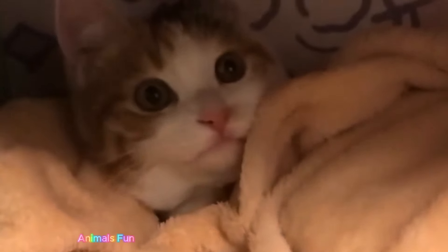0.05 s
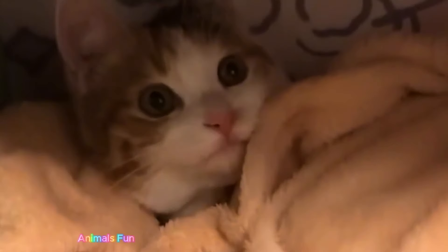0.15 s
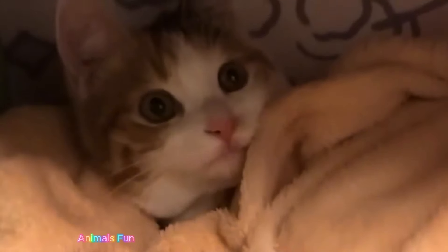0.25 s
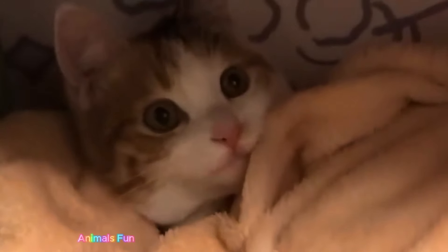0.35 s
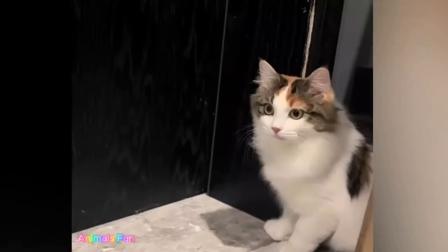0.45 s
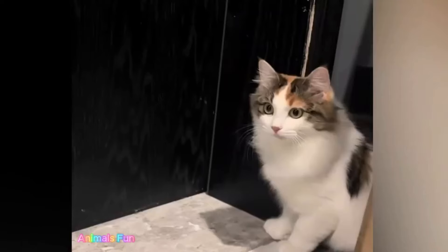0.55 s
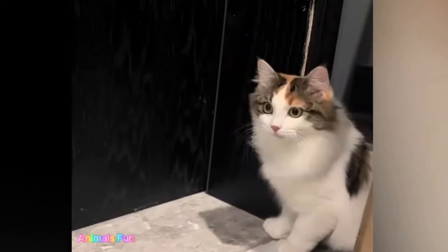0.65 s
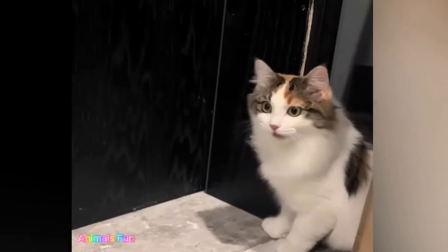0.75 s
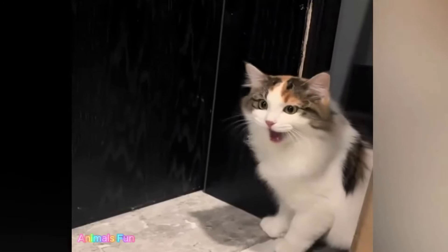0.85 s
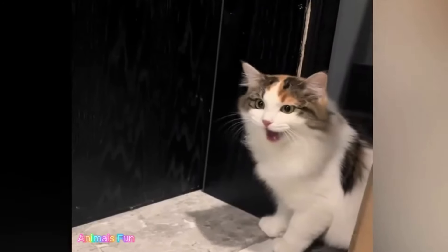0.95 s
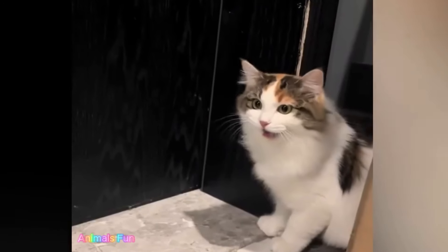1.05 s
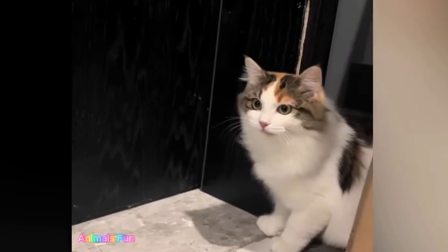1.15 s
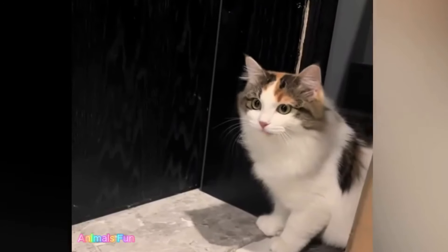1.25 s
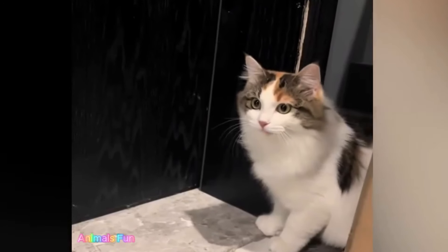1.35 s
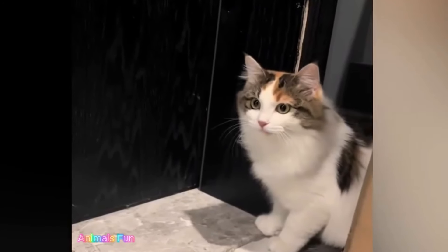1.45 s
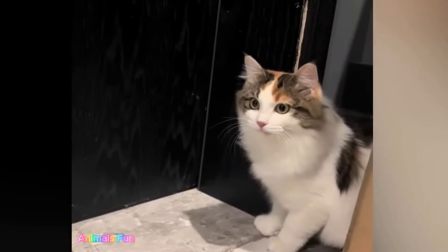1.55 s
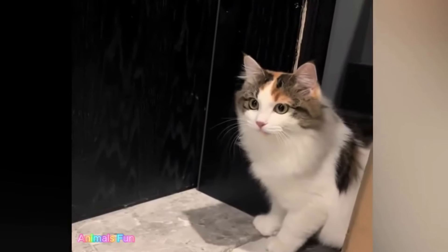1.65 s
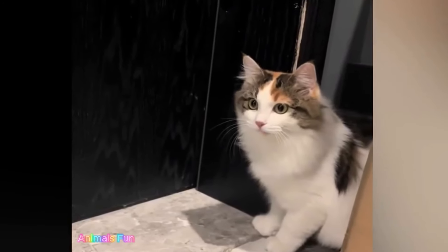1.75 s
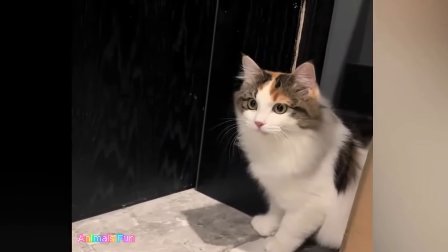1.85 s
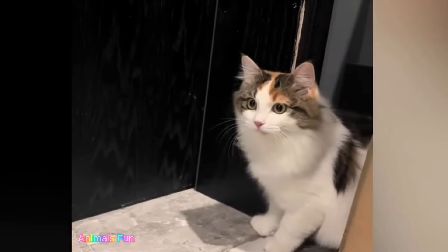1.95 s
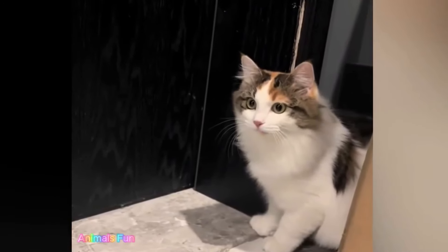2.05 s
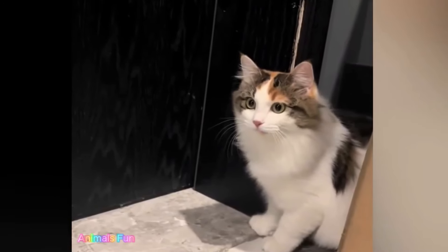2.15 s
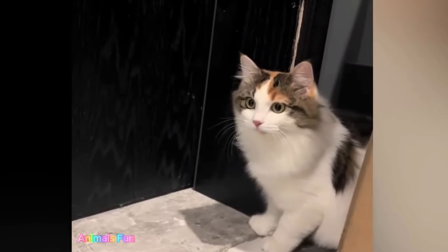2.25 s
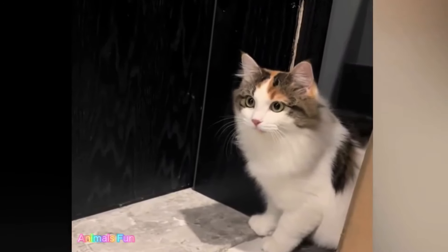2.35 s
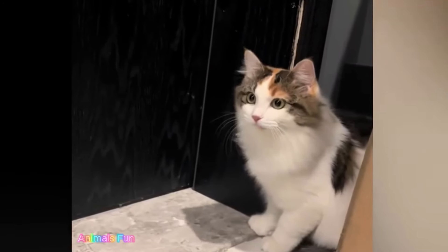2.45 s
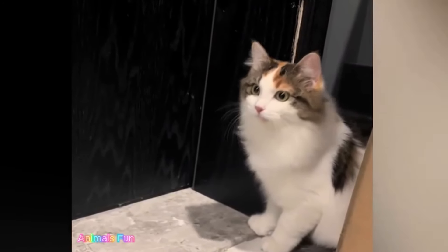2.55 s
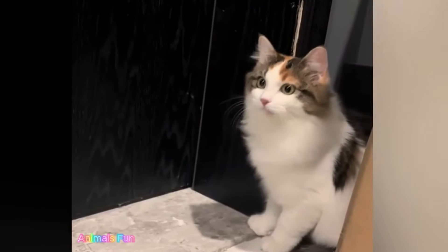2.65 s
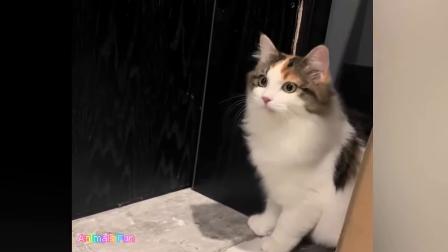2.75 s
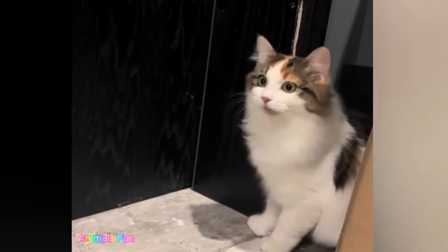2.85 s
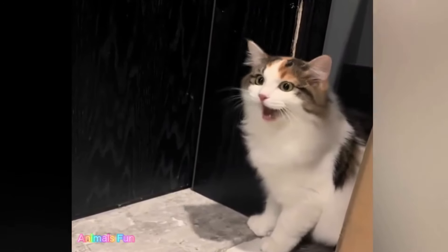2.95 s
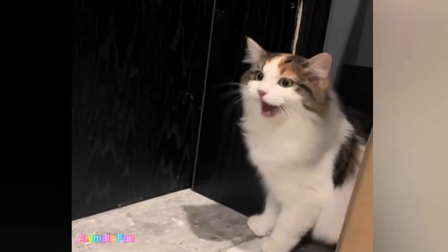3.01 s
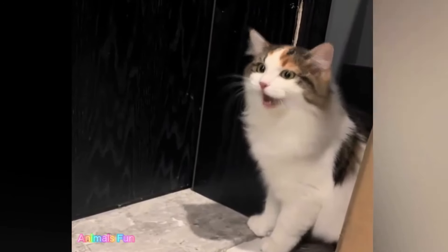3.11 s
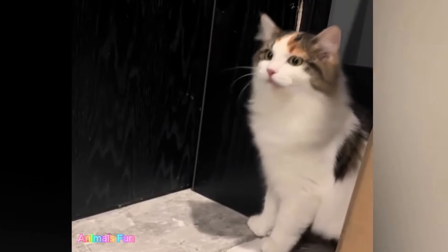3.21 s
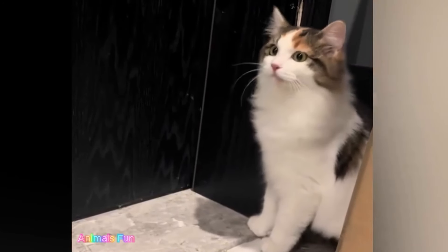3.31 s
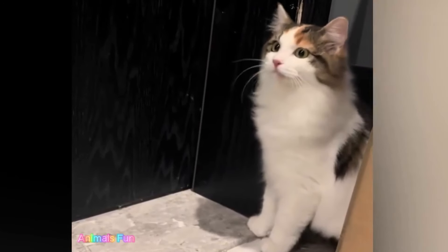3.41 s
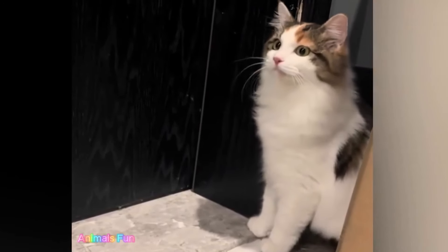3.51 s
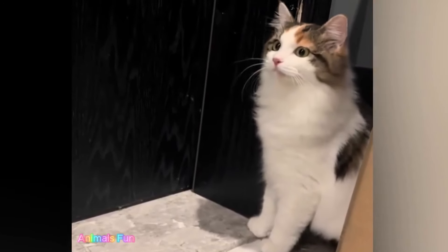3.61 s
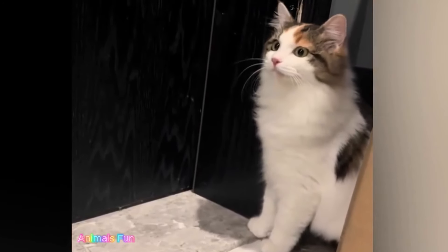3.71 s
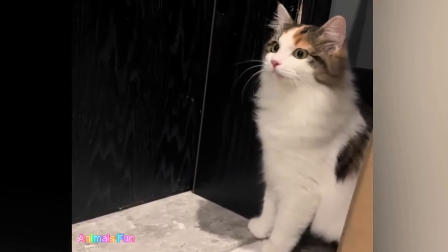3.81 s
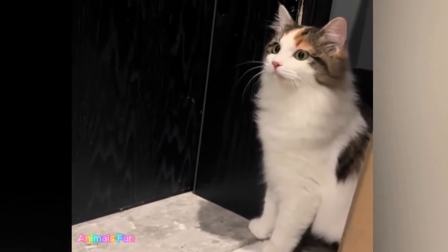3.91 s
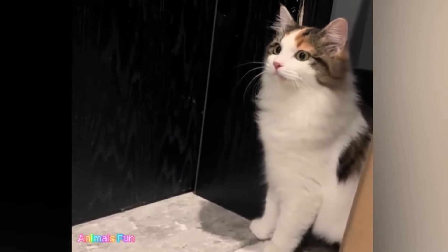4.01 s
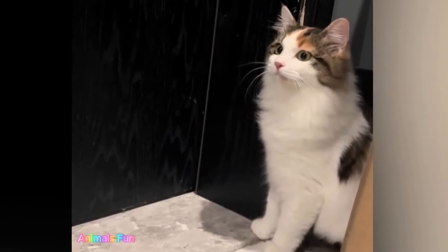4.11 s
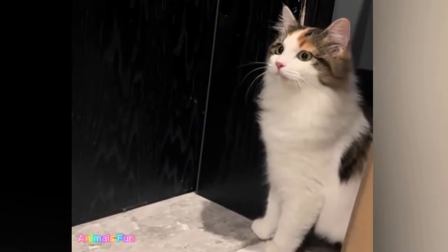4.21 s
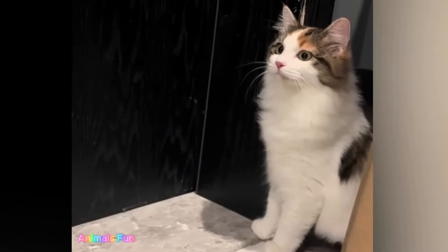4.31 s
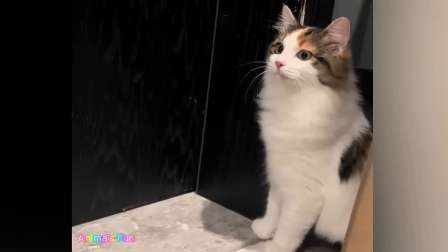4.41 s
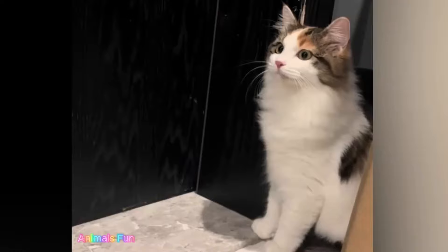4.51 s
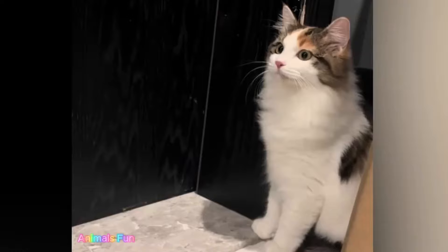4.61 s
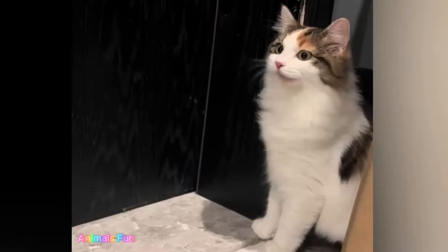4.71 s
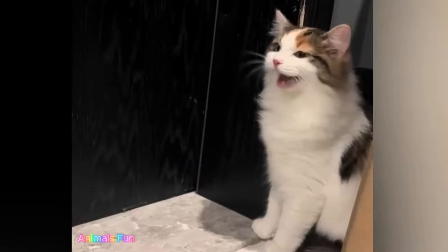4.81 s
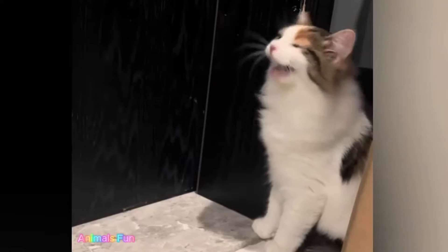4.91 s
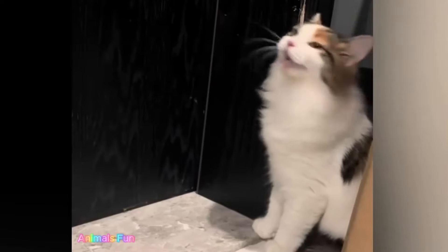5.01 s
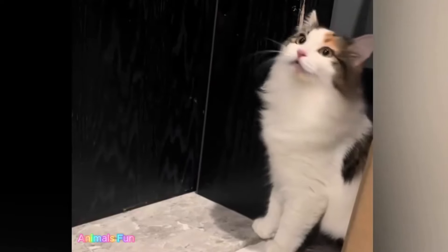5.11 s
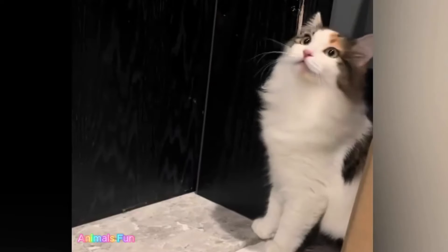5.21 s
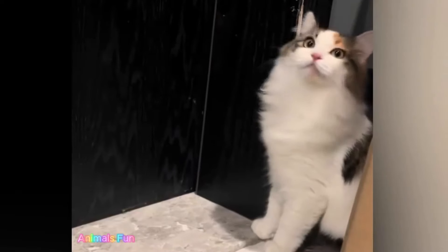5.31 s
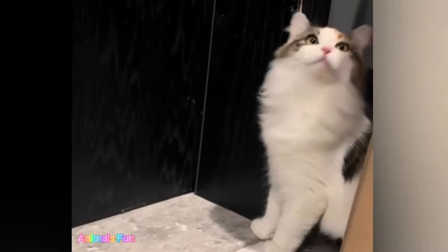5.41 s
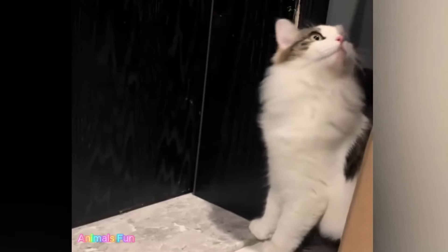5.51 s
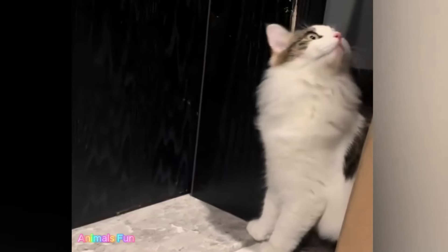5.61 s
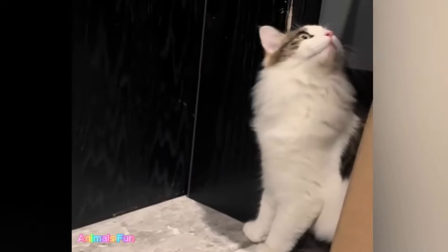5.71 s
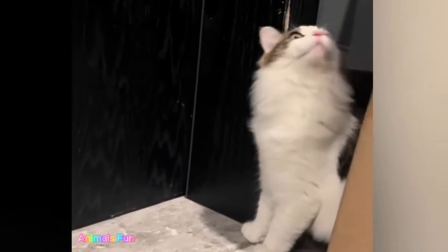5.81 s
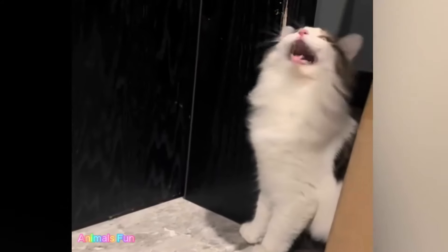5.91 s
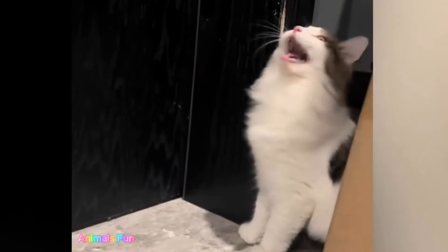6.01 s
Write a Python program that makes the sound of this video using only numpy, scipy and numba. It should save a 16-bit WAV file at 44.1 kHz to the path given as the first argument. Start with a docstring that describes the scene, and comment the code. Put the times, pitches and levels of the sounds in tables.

```python
"""A loud low rumble with hiss stops short; then a cat in the hard corner of a room meows four times, each call
rising quickly and sliding down to a held note. Small dry ticks crackle close to the phone over a faint hum and hiss.
Rumble, hum and hiss are filtered noise; a tick is a jagged push that rings two damped modes. The voice is a sum of
harmonics coloured by throat and mouth, with breath and rasp noise; wall echoes and a reverberant tail follow it."""
import sys
import numpy as np
from scipy import signal
from scipy.fft import rfft, irfft, next_fast_len
from scipy.io import wavfile
from scipy.ndimage import uniform_filter1d
from numba import njit

SR = 44100
rng = np.random.default_rng(int(sys.argv[2]) if len(sys.argv) > 2 else 0)


def materialize(psi):
    """Save the field psi as 16-bit PCM at rate SR to the path in sys.argv[1].

    A 1-D psi becomes a single channel; in a 2-D psi each row is a channel.
    """
    bounded = np.clip(np.atleast_2d(psi).T, -1, 1)
    quanta = np.round(bounded * 32767).astype(np.int16)
    wavfile.write(sys.argv[1], SR, quanta)


N = 267246
TOP_HZ = 15700  # upper limit of the phone and of the voice partials

# The loudest ticks near the phone, before its case filters them:
# (time [s], crack peak [dB], left minus right [dB], body peak over crack peak [dB])
TICKS = [(0.378, -46, 1, -7), (0.3879, -52, -6, -8), (0.416, -44.5, 2, -1), (0.4341, -36.5, -2, 1.5),
         (1.1015, -36.5, -5, -3.5), (1.109, -48, 8, 18.5), (1.2182, -40, 1, -15), (1.2287, -43.5, -6, 8),
         (1.5712, -38.5, 0, 1.5), (1.632, -51, -1, 8), (1.723, -55, -4, 8), (1.7467, -43, -2, 4.5),
         (1.7748, -44, 1, -1), (1.8124, -46, -1.5, -8), (1.8163, -41, -2, -4.5), (1.865, -50, 1, -9),
         (2.032, -44.5, 2, -8), (2.4651, -37.5, -1, 0), (2.5704, -31.5, -1, -4), (2.609, -44, -2.0, -2),
         (2.9516, -37.5, 0, 10.5), (3.1913, -32.5, -3, -7), (3.2202, -44, 16, -1),
         (3.2366, -41.5, -6, 10.5), (3.4199, -46.5, -3, 2), (3.4775, -37, -1, 3.5), (3.6985, -50.5, -5, 1),
         (3.8497, -41.5, 0, -3.5), (3.931, -39.5, 2, -21.5), (3.9713, -45.5, 19, -12),
         (4.146, -33.5, -1, -2), (4.1528, -39, 1.5, 7), (4.202, -51.5, 4, 7.5), (4.2632, -37.5, -2, -3),
         (4.2727, -41, -2, -5), (4.4815, -57, -9, 4), (5.056, -39.5, 0, -18), (5.0949, -44.5, -5, -4),
         (5.205, -39, -1, -1), (5.4099, -45.5, -1.0, -6.5), (5.427, -48.5, -4, 3)]


def undb(db):
    """Amplitude ratio of a level: 20 dB for every factor of ten."""
    return 10 ** (np.asarray(db) / 20)


def unit(x):
    """Normalisation to equal mean power: rms 1."""
    return x / np.sqrt(np.mean(x ** 2))


def along(table):
    """Linear interpolation in time: each column of a curve table, one value a sample."""
    times, *columns = np.transpose(table)
    t = np.arange(N) / SR
    return [np.interp(t, times, column) for column in columns]


def colour_db(hz, table):
    """Spectral envelope, with straight lines between the points on a log-frequency axis."""
    table_hz, table_db = np.transpose(table)
    return np.interp(np.log(np.maximum(hz, 1)), np.log(table_hz), table_db)


def noise(table):
    """Coloured noise: the spectrum of white noise weighted by an envelope, then scaled to rms 1."""
    size = next_fast_len(N)
    hz = np.arange(size // 2 + 1) * SR / size
    white = rfft(rng.standard_normal(size))
    return unit(irfft(white * undb(colour_db(hz, table)), size)[:N])


def walk(rate):
    """Slow random modulation: levels drawn `rate` times a second, smoothed twice, rms 1."""
    hold = max(int(SR / rate), 1)
    steps = np.repeat(rng.standard_normal(N // hold + 1), hold)
    return unit(uniform_filter1d(uniform_filter1d(steps, hold), hold)[:N])


def rumble():
    """Broadband noise at a steady level that sags briefly, then cuts off; the small side signal is differentiated."""
    # Rumble and its hiss: (frequency [Hz], relative level per Hz [dB])
    rumble_spectrum = [(12, -24), (20, -9.5), (126, -1.5), (252, -22.5), (324, -11), (393, -27),
                       (667, -17.5), (958, -26), (1070, -21.5), (1160, -25.5), (2680, -31.5), (3170, -37.5),
                       (9930, -49), (11700, -48), (15500, -52)]
    start_db = -32
    sag_s, sag_db_per_s = 0.26, 140
    cut_s, cut_db_per_s = 0.2967, 1800  # added to the sag
    t = np.arange(N) / SR
    sag_db = sag_db_per_s * np.maximum(t - sag_s, 0)
    cut_db = cut_db_per_s * np.maximum(t - cut_s, 0)
    middle = noise(rumble_spectrum)
    treble = np.diff(noise(rumble_spectrum), prepend=0)  # differentiation favours the treble
    return undb(start_db - sag_db - cut_db) * (middle + 0.1 * np.outer([1, -1], treble))


def tick(body_db, break_s=0.00053):
    """Impact excitation of damped modes: a jagged push rings a bright crack and a duller body, through the case."""
    # Body, then crack: (frequency [Hz], decay time [s])
    modes = [(1500., 0.0002), (4500., 0.00011)]
    # Band that the phone's case passes: (lower edge [Hz], upper edge [Hz])
    case_band = [470, 8820]
    t = np.arange(256) / SR
    push = np.exp(-t / break_s) * rng.standard_normal(256)
    body, crack = (np.convolve(push, np.exp(-t / decay_s) * np.sin(2 * np.pi * hz * t))[:256]
                   for hz, decay_s in modes)
    snap = crack / np.max(np.abs(crack)) + undb(body_db) * body / np.max(np.abs(body))
    return signal.sosfilt(signal.butter(2, case_band, "bandpass", fs=SR, output="sos"), snap)


def crackle(stir_s=0.022, kinds=8):
    """Shot noise over a soft rustle: random tiny ticks, unlike at the two ports, thicken around every loud tick."""
    # Common level of crackle and rustle, before their own gains: (time [s], level [dB])
    crackle_level = [(0.34, -82), (1.47, -77.5), (2.05, -80.5), (2.13, -87), (2.29, -86.5), (2.36, -79.5),
                     (2.6, -77.5), (3.5, -81.5), (4.066, -76), (4.264, -79), (4.5, -77), (5.36, -77.5),
                     (5.46, -85)]
    # Rustle: (frequency [Hz], relative level per Hz [dB])
    hiss_spectrum = [(150, -34), (250, 3), (742, 6), (1100, -3), (2020, 2.5), (2320, -2), (4470, -7),
                     (15500, -24.5)]
    grains_per_s = 250  # before stir and drift
    loud = np.zeros(N)
    for s, db, *_ in TICKS:
        loud[int(s * SR)] = undb(1.08 * (db + 40))
    stir = 1 + 1.17 * np.convolve(loud, np.hanning(int(stir_s * SR)), "same")

    chance = rng.random((3, N))
    fired = chance[0] < grains_per_s / SR * stir * undb(4 * walk(20))
    sizes = fired * undb(-3 * np.log(chance[1] + .01))  # many small, few large
    pan = undb(16.0 * (chance[2] - 0.5))
    panned = sizes * np.array([pan, 1 / pan])
    kind = rng.integers(0, kinds, N)  # every tiny tick takes one of a few shapes
    grains = np.zeros((2, N))
    for k in range(kinds):
        grains += signal.oaconvolve(panned * (kind == k), tick(4.)[None], axes=1)[:, :N]

    flicker = undb(1.5 * walk(30) + 2.0 * walk(9))
    rustle = noise(hiss_spectrum) + 0.44 * np.outer([1, -1], noise(hiss_spectrum))
    level_db = along(crackle_level)[0]
    started = np.arange(N) > .31 * SR
    return (undb(7) * rustle * stir * flicker + undb(10.5) * grains) * undb(level_db) * started


def ticks():
    """Superposition of separate impacts, placed left or right by a level difference between the ports."""
    out = np.zeros((2, N + 256))
    for s, db, pan_db, body_db in TICKS:
        i = int(s * SR)
        sides = undb([db + pan_db / 2, db - pan_db / 2])
        out[:, i:i + 256] += np.outer(sides, tick(body_db))
    return out[:, :N]


def hum():
    """Low-frequency noise, strongly correlated between the ports, that fades in and slowly wavers in level."""
    # Hum: (frequency [Hz], relative level per Hz [dB])
    hum_spectrum = [(12, -46), (20, 1), (37, -3.5), (91, 5), (150, -9), (204, -8), (226, -26), (253, -20),
                    (300, -42.5), (390, -53), (660, -120)]
    middle_db, side_db = -60, -35.5  # level before wavering; side signal relative to the middle
    start_s, rise_s = 0.41, 0.1
    rise = np.clip((np.arange(N) / SR - start_s) / rise_s, 0, 1)
    ports = noise(hum_spectrum) + undb(side_db) * np.outer([1, -1], noise(hum_spectrum))
    return rise * ports * undb(middle_db + 1.5 * walk(1))


def cat(count=22):
    """Source and filter: harmonics coloured by throat and mouth; a fast slide makes pitch and partials unsteady."""
    # The meows, each a quick rise, a break of the voice, a slide and a held note: (time [s], pitch [Hz],
    # level before colour [dB], mouth opening [0-1], mouth resonance [Hz], fundamental over mouth colour [dB])
    meows = [
        [(0.535, 800, -55, 0.05, 1640, -8), (0.562, 873, -44.5, 0.39, 1750, 9),
         (0.58, 930, -42, 0.4, 1840, -4.5), (0.622, 929, -32.5, 0.44, 1920, -15),
         (0.626, 869, -29.5, 0.53, 1880, -17), (0.672, 773, -35.5, 0.63, 1780, -24.5),
         (0.702, 732.6, -35, 0.64, 1980, -19), (0.778, 663, -36, 0.63, 1960, -18),
         (0.9, 634.7, -39, 0.45, 1980, -27), (1.02, 648.7, -44.5, 0.29, 1950, -20),
         (1.06, 655, -46.5, 0.2, 1907, -3), (1.2, 645, -47, 0.08, 1940, -5), (1.299, 629.7, -49, 0.24, 1860, 4),
         (1.325, 549, -63.5, 0.6, 1832, 13.5)],
        [(2.68, 942, -59, 0.45, 1920, -4), (2.699, 960, -32, 0.47, 1900, -5),
         (2.716, 938, -42.5, 0.57, 1873, 2), (2.722, 820, -43.5, 0.84, 1770, -3.5),
         (2.742, 786.4, -35, 0.5, 1930, -13), (2.812, 697, -31, 0.62, 1893, -21.5),
         (2.872, 651.5, -36, 0.68, 1825, -10.5), (2.955, 637, -29, 0.26, 1884, -24),
         (3.03, 635, -35.5, 0.17, 1820, -11.5), (3.095, 635.7, -43, 0.27, 1844, -4.5),
         (3.147, 643.5, -42.5, 0.11, 1920, -8), (3.245, 650.6, -50, 0.21, 1990, -6.5),
         (3.285, 557, -61, 0.61, 1833, 5)],
        [(4.528, 810, -50, 0.03, 1724, 0), (4.556, 948, -53.5, 0.68, 1800, 15),
         (4.586, 912, -57.5, 0.9, 1970, 12), (4.592, 867, -45.5, 0.8, 1940, 4.5),
         (4.672, 688, -37, 0.54, 1980, -15.5), (4.72, 642, -43.5, 0.8, 1964, -8.5),
         (4.74, 631.6, -39.5, 0.78, 1885, -16), (4.78, 632.4, -37, 0.57, 1912, -15.5),
         (4.85, 626.3, -38, 0.45, 1913, -8), (4.921, 616.4, -51.5, 0.62, 1917, -3),
         (5.075, 624.5, -42.5, 0.14, 1798, -2.5), (5.185, 650, -53, 0.22, 1928, -8),
         (5.24, 629.6, -54.5, 0.45, 1993, 7)],
        [(5.667, 859, -61, 0.46, 1755, 12), (5.678, 890, -54, 0.7, 1870, 16), (5.712, 967, -44, 0.68, 2003, 8),
         (5.718, 812, -37.5, 0.63, 1840, -3), (5.798, 742.6, -44, 0.87, 1920, -3.5),
         (5.842, 729, -39.5, 0.78, 1912, -20), (5.942, 634.4, -40.5, 0.65, 1964, -10),
         (6.016, 616, -36.5, 0.6, 1954, -22), (6.06, 625, -36.5, 0.37, 1880, -17.0)],
    ]
    # Voice colour, mouth wide open, before it stretches: (frequency [Hz], gain [dB])
    throat = [(550, -2), (900, 3.5), (1280, -3), (1500, -6.5), (1750, 11), (1900, 36), (2050, 27.5),
              (2250, 15.5), (2500, 2.5), (2850, 11), (3200, -2.5), (4500, -4), (6500, 1), (7800, -18),
              (8800, -36.5), (9700, -39), (12000, -65.5)]
    # Change of that colour with the mouth shut, before it stretches: (frequency [Hz], gain [dB])
    shutting = [(550, -4.5), (1280, 4), (1900, -66), (2850, -27), (4000, -39), (6500, -47.5), (12000, 11)]
    # Breath through the mouth: (frequency [Hz], relative level per Hz [dB])
    breath_spectrum = [(2060, -37.5), (3500, 1.5), (6550, 4), (7870, -2.5), (8830, -30), (9680, -11.5),
                       (12300, -39.5), (14100, -37.5), (15000, -44.5)]
    throat_peak_hz = 1900  # main resonance in both colour tables, which stretch with it
    break_per_s, break_db = 12, -9  # a faster pitch jump (log pitch per second) chokes the voice
    breath_db, breath_shut_db = 3.5, -39  # over the voice level, before roughness; change when shut

    t = np.arange(N) / SR
    hz, level_db, opening, mouth_hz, first_db = along(np.concatenate(meows))
    on = sum((t > meow[0][0]) & (t <= meow[-1][0]) for meow in meows)
    shut = 1 - np.clip(opening, 0, 1)
    speed = np.abs(np.gradient(np.log(hz))) * SR  # log pitch per second
    slide = uniform_filter1d(speed, size=900)
    choke = undb(break_db * uniform_filter1d(1. * (speed > break_per_s), size=130))
    rough = np.clip(0.19 + 0.14 * slide, 0, .7)

    order = np.arange(1, count + 1)[:, None]
    partial_hz = order * hz
    place_hz = partial_hz * throat_peak_hz / mouth_hz  # where each partial falls in the colour tables
    mouth_db = colour_db(place_hz, throat) + shut * colour_db(place_hz, shutting)
    gains = undb(level_db + mouth_db + first_db * (order == 1))
    flutter_db = 5 * rough + 2.5 * (order > 5)
    gains *= undb(flutter_db * np.array([walk(50) for _ in order])) * (partial_hz < TOP_HZ)
    gains[3:] *= undb(3.5 * np.array([walk(9) for _ in order[3:]]) - 1)  # upper partials come and go

    shaky_hz = hz * (1 + 0.024 * rough * walk(250))
    phase = 2 * np.pi * np.cumsum(shaky_hz) / SR
    tone = np.sqrt(2) * np.sum(gains * np.sin(order * phase + order ** 2), axis=0)
    breath = rough * undb(level_db + breath_db + shut * breath_shut_db) * noise(breath_spectrum)
    return (choke * tone + breath) * uniform_filter1d(1. * on, size=300)


def later(x, ms):
    """Propagation delay: the sound moved by a fractional number of samples."""
    return np.interp(np.arange(N) - ms * SR / 1000, np.arange(N), x, left=0)


@njit
def walls(x, lags, gain, damp):
    """Feedback delay network: eight coupled paths, each low-passed so that every round is duller."""
    line, soft, out = np.zeros((8, 4096)), np.zeros(8), np.zeros((2, len(x)))
    for i in range(len(x)):
        total = 0.
        for k in range(8):
            arriving = gain[k] * line[k, (i - lags[k]) & 4095]
            soft[k] += (1 - damp) * (arriving - soft[k])
            total += soft[k]
            out[k % 2, i] += soft[k]
        for k in range(8):
            line[k, i & 4095] = x[i] + soft[k] - total / 4  # energy-preserving exchange
    return out


def room(voice):
    """Early reflections interfere with the direct sound; a reverberant tail decays after them."""
    # First echoes off floor and corner walls; they throb against the direct sound while the pitch
    # slides: (delay [ms], left amplitude over direct [ratio], right amplitude over direct [ratio])
    echoes = [(0.324, 0.24, -0.16), (2.33, -0.16, 0.055), (5.108, 0.27, -0.3), (12.093, 0.11, 0.48),
              (16.99, -0.38, 0.71), (22.94, 0.5, 0.13)]
    # Paths between the walls: (delay [ms])
    path_ms = [21, 15, 25.9, 27, 34.7, 39.1, 45.7, 37]
    t60_s, damp = 1.25, 0.34  # decay time before the treble loss; low-pass coefficient
    middle_db, side_db = -26.5, -25.5
    near = voice + sum(np.outer([left, right], later(voice, ms)) for ms, left, right in echoes)
    lags = (np.array(path_ms) * SR / 1000).astype(np.int64)
    round_gain = undb(-60 * lags / SR / t60_s)
    middle, side = walls(voice + 1e-18, lags, round_gain, damp)  # tiny offset avoids slow arithmetic
    return near + undb(middle_db) * middle + undb(side_db) * np.array([side, -side])


def rasps():
    """Turbulent noise through the closing throat: half-sine bursts of unsteady level."""
    # The throat closes with a short rasp: (start [s], peak gain before flutter [dB], length [s])
    bursts = [(1.296, -48, 0.036), (3.26, -49.5, 0.035), (5.22, -48, 0.027)]
    # Rasp: (frequency [Hz], relative level per Hz [dB])
    rasp_spectrum = [(350, -16), (580, 15.5), (850, -14.5), (1150, 1), (1600, -12), (2600, -40), (3300, -2),
                     (4200, -19), (5700, -17), (6800, -17), (15000, -46)]
    t = np.arange(N) / SR
    shape = sum(undb(db) * np.sin(np.pi * np.clip((t - s) / length, 0, 1)) for s, db, length in bursts)
    return shape * noise(rasp_spectrum) * undb(2.5 * walk(120))


def scene():
    """Linear superposition of all sources at the two ports; only the cat's sounds excite the room."""
    return rumble() + crackle() + ticks() + hum() + room(cat() + rasps())


def record(dry):
    """Band limitation: the phone's steep low-pass cuts the top."""
    return signal.sosfilt(signal.ellip(10, .2, 80, TOP_HZ, fs=SR, output="sos"), dry)


dry = scene()
out = record(dry)
materialize(out)
```